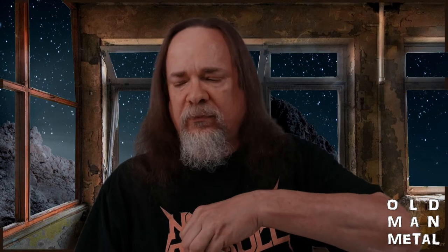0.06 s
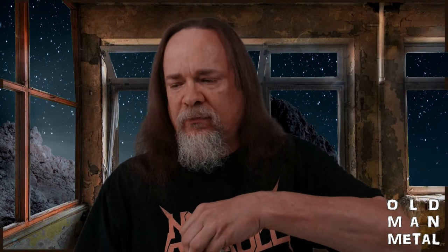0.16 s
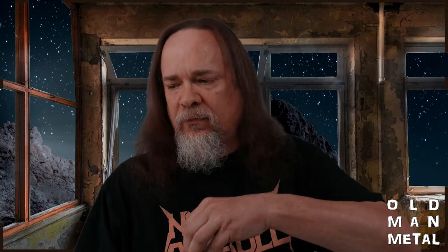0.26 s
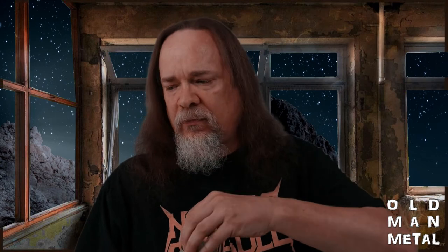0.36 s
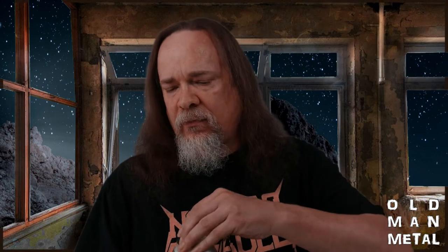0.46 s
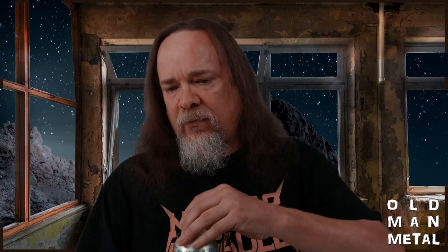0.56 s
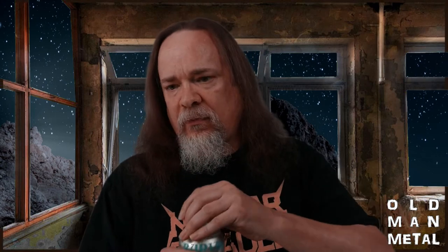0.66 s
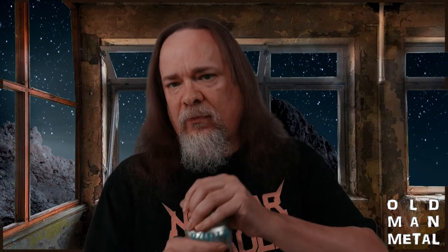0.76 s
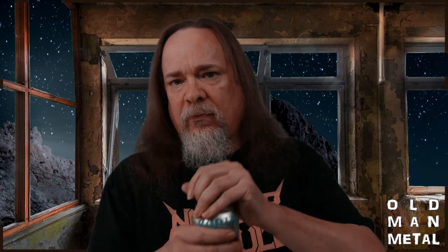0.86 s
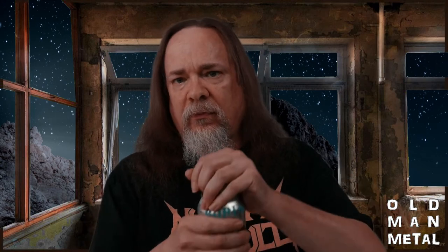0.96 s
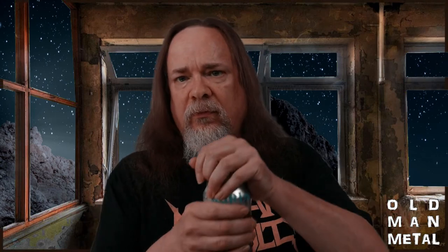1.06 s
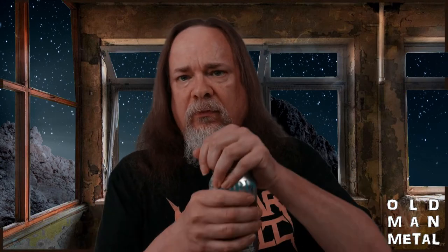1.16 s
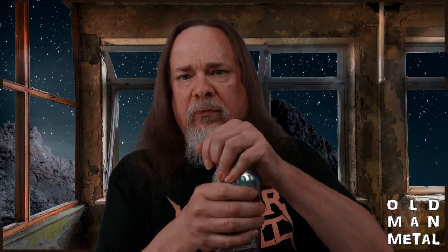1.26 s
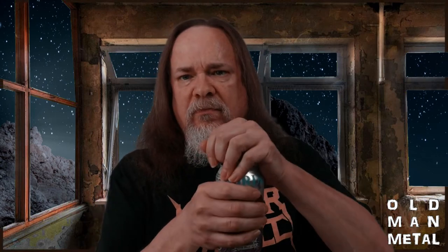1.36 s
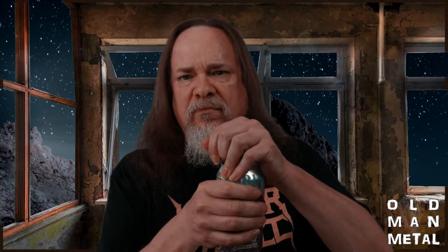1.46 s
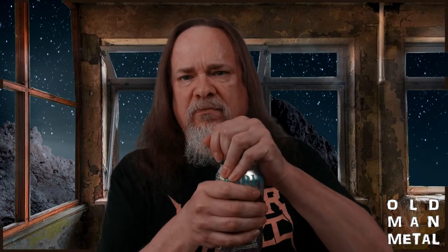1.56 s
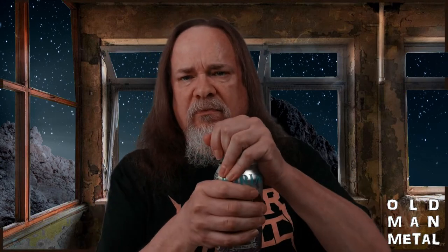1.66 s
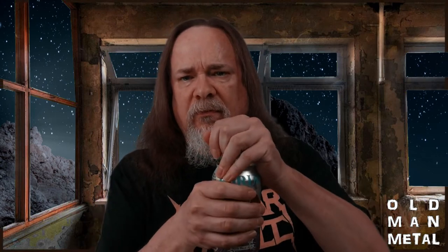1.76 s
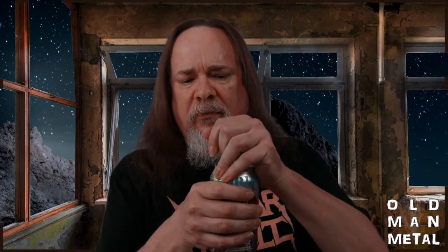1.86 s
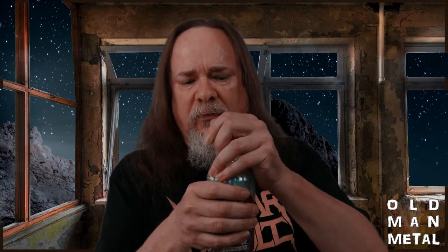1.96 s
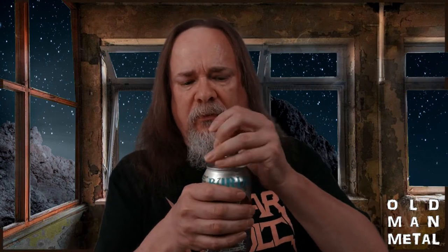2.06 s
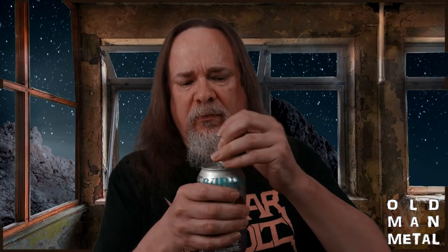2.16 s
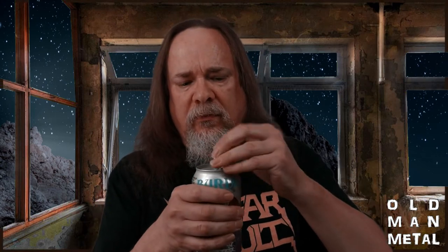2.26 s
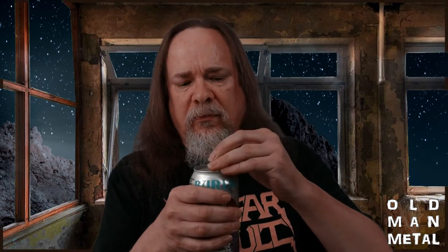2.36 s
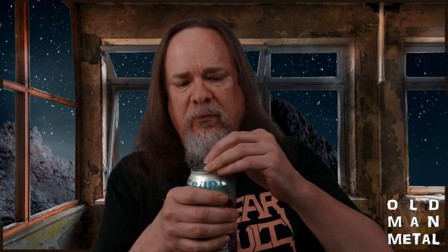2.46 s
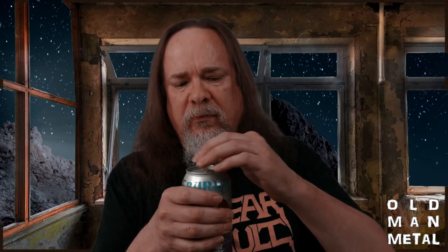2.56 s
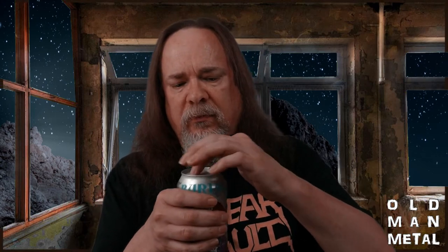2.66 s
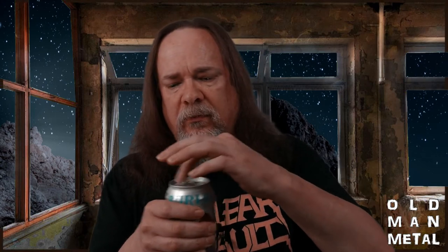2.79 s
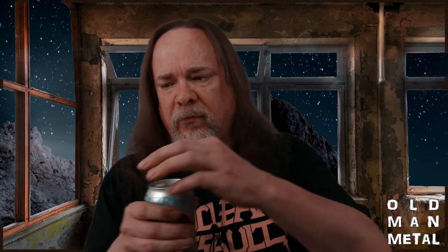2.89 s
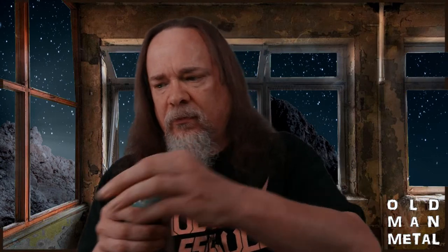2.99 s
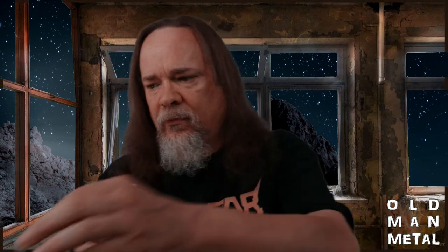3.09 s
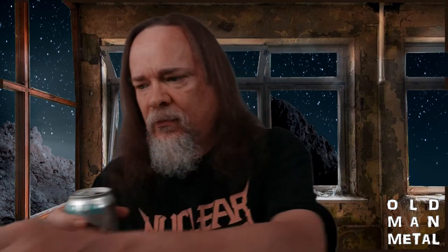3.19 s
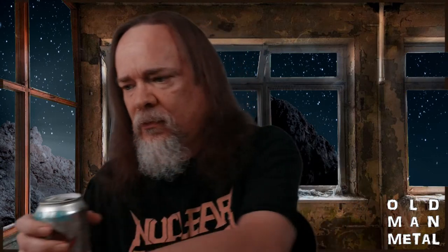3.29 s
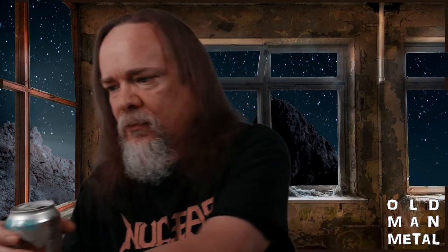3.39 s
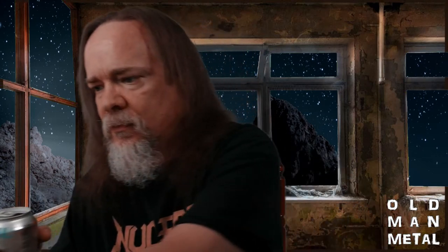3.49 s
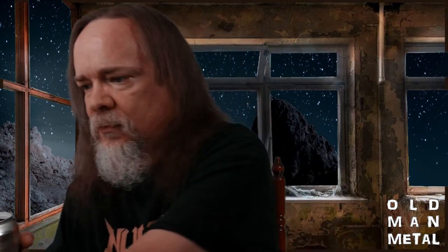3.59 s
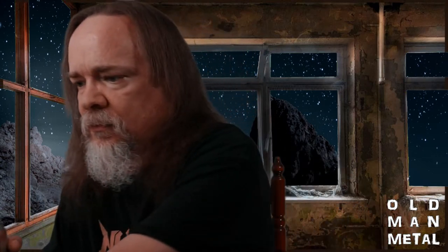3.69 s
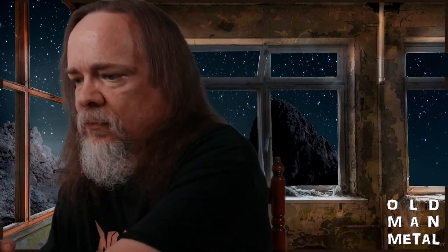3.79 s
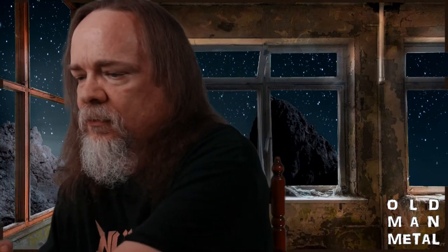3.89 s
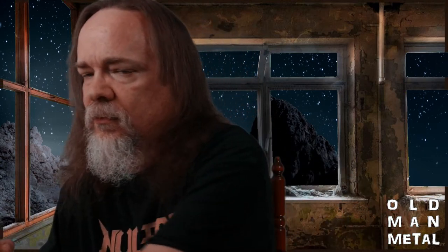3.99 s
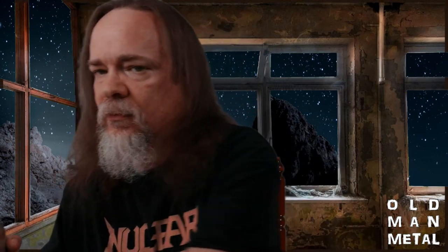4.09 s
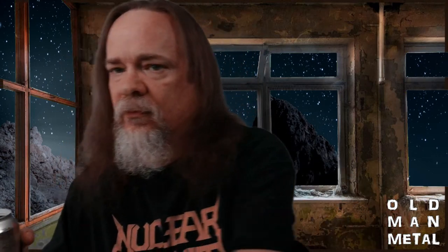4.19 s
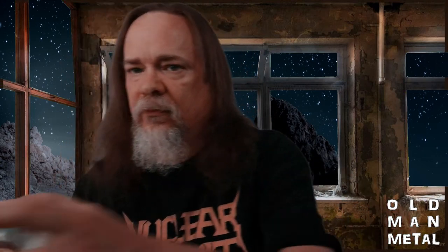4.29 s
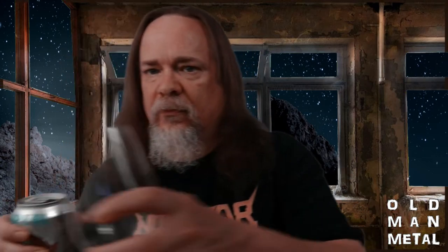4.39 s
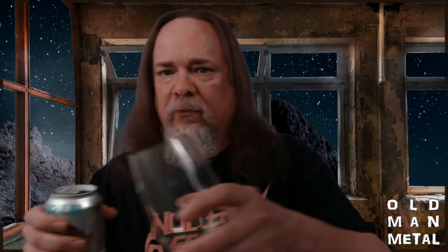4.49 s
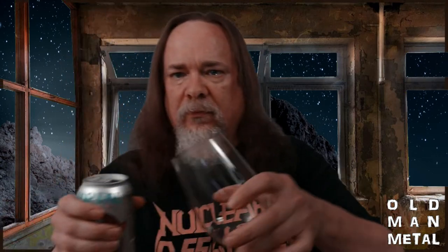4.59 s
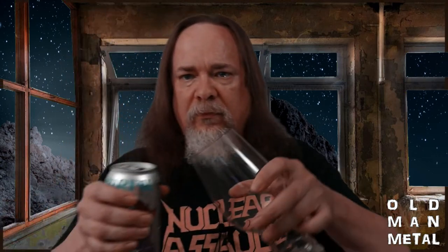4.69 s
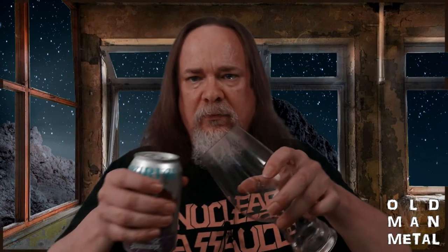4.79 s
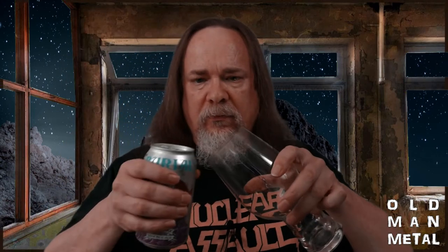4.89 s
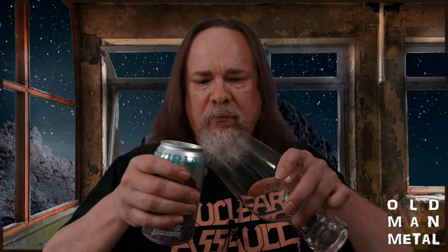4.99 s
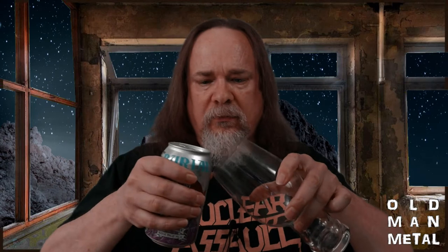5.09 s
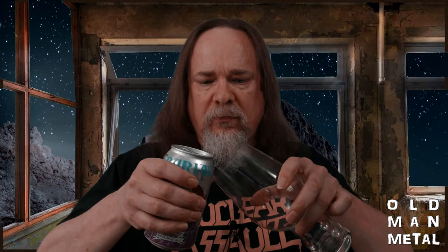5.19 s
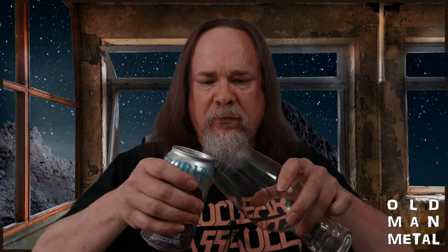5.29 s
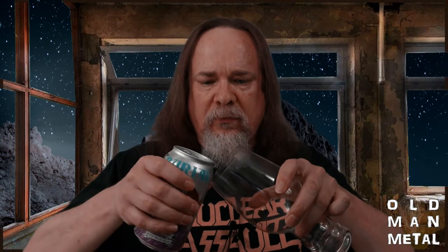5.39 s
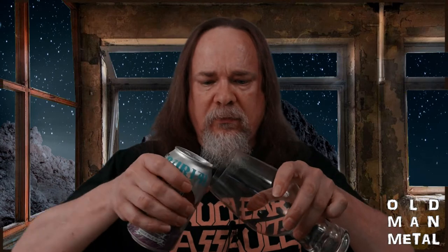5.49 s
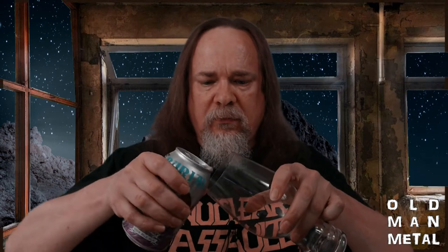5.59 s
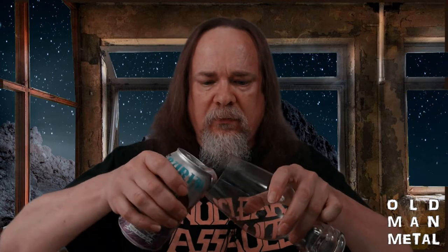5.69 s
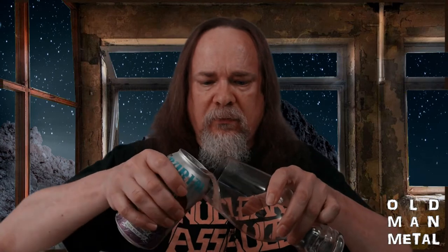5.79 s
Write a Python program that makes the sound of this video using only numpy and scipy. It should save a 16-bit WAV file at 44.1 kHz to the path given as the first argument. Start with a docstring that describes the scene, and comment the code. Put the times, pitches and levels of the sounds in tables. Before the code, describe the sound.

A fingernail picks at the tab of an aluminium drink can. The seal cracks with a very short hiss, and the lid tears open in a quick run of sharp metallic snaps. A small hollow plop and a few light ticks follow as the tab is pressed back. Then a wooden chair creaks softly and clothing rustles faintly. The microphone is close, in a small quiet room.

```python
"""Opening an aluminium beer can

Close to a microphone in a small quiet room, a fingernail picks at the tab and the seal cracks.
Gas spits out as a turbulent jet, and the lid tears in a run of snaps that excite the can's modes.
The tab is pressed back with a hollow plop and a few ticks. Then friction makes sleeves rustle
and a chair creak as the drinker leans over for a glass."""
import sys
import numpy as np
from scipy import signal
from scipy.fft import rfft, irfft, next_fast_len
from scipy.io import wavfile
from scipy.ndimage import uniform_filter1d, minimum_filter1d

SR = 44100
rng = np.random.default_rng(int(sys.argv[2]) if len(sys.argv) > 2 else 0)


def digitize_waveform(pressure):
    """Quantize a signal to 16-bit integers and store it at the path in sys.argv[1].

    Rows of a 2-D input are taken as channels; values are limited to [-1, 1].
    """
    field = np.atleast_2d(pressure).T
    bounded = np.clip(field, -1, 1)
    quanta = np.round(bounded * 32767).astype(np.int16)
    wavfile.write(sys.argv[1], SR, quanta)


N = 257984
TIME = np.arange(N) / SR
AGE = TIME[:SR // 3]  # seconds since a blow


# Tears along the score. Each row: start in seconds, level in dB, tilt in dB per octave, wall in dB.
LID_TEARS = [(1.4479, -2.5, 0.5, -48), (1.5464, -24, 0, -36), (1.5543, -10.5, 2, -29),
             (1.5735, -30, 0, -42), (1.5802, -7.5, -3, -37), (1.5856, -14, -2, -36), (1.6049, -15, -3, -32),
             (1.6169, -12, -2, -25), (1.6190, -13, -1, -28), (1.6211, -6, -2.5, -21),
             (1.6237, -3, -0.5, -17), (1.7408, -43, -2, -52)]
# Modes of the tearing lid. Each row: frequency in Hz, level in dB, T60 in seconds.
LID_MODES = [(1693, -5.5, 0.019), (2056, -2, 0.015), (2734, -11.5, 0.0088), (4590, -5.5, 0.013),
             (5360, -14.5, .011), (6230, -8, 0.0099), (7270, -9, 0.0083), (9000, -7.5, 0.003),
             (9700, -16.5, 0.0073), (12550, -18, 0.016)]
# Spectrum of ripping metal. Each row: frequency in Hz, spectral density in dB.
RIP_SPECTRUM = [(600, -27.5), (1200, -9.5), (1650, 1.5), (2100, -4), (3400, -12), (4600, -10.5),
                (8000, -12.5), (15000, -20)]

def tearing():
    """Fracture releases stress in snaps, with a grainy rip between; a small plate radiates no bass."""
    # a duller tear snaps less
    blows = [(s, db, db - 4 + 0.5 * tilt_db, tilt_db) for s, db, tilt_db, _ in LID_TEARS]
    snaps = strikes(blows, LID_MODES, snap_t60=.014, rise=.0002, front=.6)
    start_s, hold_s = 1.536, .085
    lever = np.clip((TIME - start_s) / hold_s, 0, 1)  # the rip grows as the tab is lifted
    effort = from_db(-36 + 4 * lever) * burst(start_s, attack=.015, hold=hold_s, t60=.15)
    rip = effort * noise(RIP_SPECTRUM, N) * grains(N, spread_db=4.5, size=40)
    return high_pass(snaps + rip, hz=950)


# The first crack and a last spit. Each row: start in seconds, level in dB, hold and T60 in seconds.
GAS_SPURTS = [(1.447, -26, .024, .055), (1.6228, -12.5, .003, .007)]
# Spectrum of the jet. Each row: frequency in Hz, spectral density in dB.
JET_SPECTRUM = [(300, -26), (900, -8), (1700, 0), (2400, -2), (3500, -9), (4700, -3), (7300, -1), (8550, 5),
                (9300, -1), (10500, -5), (13000, -4), (15500, -6)]

def gas_jet():
    """Turbulence in the narrow slit hisses and is spent within a few hundredths of a second."""
    flow = sum(from_db(db) * burst(s, .002, hold, t60) for s, db, hold, t60 in GAS_SPURTS)
    return flow * noise(JET_SPECTRUM, N)


# Spectrum of the puff. Each row: frequency in Hz, spectral density in dB.
PUFF_SPECTRUM = [(30, -8), (130, -2), (350, -8.5), (550, -7), (1000, -15.5), (3000, -64)]

def gas_puff():
    """Wind noise: the first spurt buffets the microphone with low pressure fluctuations."""
    gust = burst(GAS_SPURTS[0][0], attack=.002, hold=.026, t60=.075)
    return from_db(-39.5) * gust * noise(PUFF_SPECTRUM, N)


# Fingernail picks. Each row: start in seconds, ring in dB, snap in dB, tilt in dB per octave.
NAIL_PICKS = [(0.3446, -59, -39, -3.5), (0.3700, -55, -37, -6), (0.3836, -36.5, -35, 5),
              (0.42, -20, -22.5, -1), (0.4464, -43, -36.5, -5), (0.669, -51, -38, -8),
              (0.8290, -57, -51, -3), (0.8358, -53, -42.5, -1.5), (2.0598, -44.5, -48, 1),
              (2.1020, -49, -60, -6), (5.1610, -59, -45, -10), (5.1660, -57, -46.5, 0.5)]
# Modes of a tick on the lid. Each row: frequency in Hz, level in dB, T60 in seconds.
LID_TICK_MODES = [(1950, 0, .06), (4160, -10, .011), (5120, -14, .012), (6120, -16, .012)]
# Slides over the lid. Each row: peak time in seconds, level in dB, seconds to fade by 20 dB.
NAIL_SLIDES = [(0.29, -66, .02), (0.358, -56, .025), (0.421, -36, .007), (0.889, -60, .018)]
# Spectrum of the sliding nail. Each row: frequency in Hz, spectral density in dB.
NAIL_SPECTRUM = [(1200, -9), (2000, -6.5), (3200, -27), (4250, 4.5), (5000, -26), (8000, -24), (15000, -57)]

def fingernail():
    """Impacts on tab and can, before and after it opens, ping briefly; friction adds a faint scrape."""
    picks = strikes(NAIL_PICKS, LID_TICK_MODES, snap_t60=.02, rise=.00059, front=.19)
    scrape = swells(NAIL_SLIDES) * noise(NAIL_SPECTRUM, N) * grains(N, spread_db=3, size=90)
    return picks + scrape


# Modes of the can wall. Each row: frequency in Hz, level in dB, T60 in seconds.
WALL_MODES = [(434, -11, 0.011), (616, -7, .014), (793, -6, .022), (1073, -1.5, 0.026), (1262, 0, 0.031)]

def wall(pick_db=-11.5, snap_db=-15.5, tilt_db=-3.5):
    """Mechanical coupling: picks and tears flex the thin wall, most as the flap gives way."""
    from_picks = [(s, db + pick_db) for s, db, _, _ in NAIL_PICKS]
    from_tears = [(s, db) for s, _, _, db in LID_TEARS]
    blows = [(s, db, db + snap_db, tilt_db) for s, db in from_picks + from_tears]
    return high_pass(strikes(blows, WALL_MODES, snap_t60=.012, rise=.00017, front=.33), hz=420)


# Modes of the opened can. Each row: frequency in Hz, level in dB, T60 in seconds.
CAVITY_MODES = [(776, -13, .42), (1309, -6, .29), (1541, -7, .22), (1665, 1, .2), (2041, -1, .18),
                (2114, -3, .17), (4618, -4, .17), (7255, -4, .19), (8562, -5, .16)]

def cavity(coupling_db=-34):
    """Resonance: once the seal is broken, each further tear leaves a faint metallic ring in the can."""
    out = np.zeros(N)
    for s, tear_db, _, _ in LID_TEARS[1:]:
        for hz, db, t60 in CAVITY_MODES:
            add(out, s, mode(hz, tear_db + coupling_db + db, t60, rise=.0027))
    return out


# Taps on the tab. Each row: start in seconds, ring in dB, snap in dB, tilt in dB per octave.
TAB_TAPS = [(1.9968, -40, -47, -16), (2.4232, -31.5, -48, -11), (2.5630, -52, -51, -13),
            (2.6772, -43.5, -56, 2), (2.6935, -47, -46, 6.5), (2.7050, -51, -60, 0),
            (2.7685, -38.5, -53, -3.5)]
# Modes of the loose tab. Each row: frequency in Hz, level in dB, T60 in seconds.
TAB_MODES = [(540, -18.5, 0.07), (1630, -18, 0.045), (1996, -0.5, 0.016), (2355, -2.5, 0.017),
             (2920, -11, 0.03)]

def tab():
    """Strong damping: the loose tab only ticks as it is pressed back and tapped."""
    return strikes(TAB_TAPS, TAB_MODES, snap_t60=.016, rise=.000099, front=.34)


# The plop. Its row: start in seconds, ring in dB, snap in dB, tilt in dB per octave.
AIR_PLOPS = [(1.9975, -31.5, -55, -5)]
# Modes of the air pocket. Each row: frequency in Hz, level in dB, T60 in seconds.
POCKET_MODES = [(497, -4, 0.19), (588, 5.5, 0.041)]

def air_pocket():
    """Air resonance in the opened can gives a hollow plop."""
    return strikes(AIR_PLOPS, POCKET_MODES, snap_t60=.025, rise=.002, front=.2)


# Creaks of the joints. Each row: start in seconds, crack in dB, thud in dB, rise in seconds.
CHAIR_CREAKS = [(3.139, -53, -57.5, 0.006), (3.449, -41.5, -63, 0.0037), (3.487, -45.5, -60, 0.0088),
                (3.552, -39.5, -48.5, .0087), (3.647, -34, -43.5, 0.01), (3.791, -32, -46.5, 0.024),
                (3.841, -38.5, -41.5, 0.0052), (4.440, -54.5, -66, .0056), (4.637, -40.5, -59, 0.0094)]
# Spectrum of the wood. Each row: frequency in Hz, spectral density in dB.
WOOD_SPECTRUM = [(100, -13), (350, 2.5), (750, -0.5), (1050, 3.5), (1550, -2), (2100, -9.5), (3100, -15),
                 (4200, -22.5), (9000, -29.5), (15000, -37)]

def chair(thud_lag_s=.0052):
    """Stick-slip friction: a joint slips under shifting weight and the frame answers with a thud."""
    out = np.zeros(N)
    for s, crack_db, thud_db, rise in CHAIR_CREAKS:
        slips = grains(len(AGE), spread_db=1.5, size=60) * noise(WOOD_SPECTRUM, len(AGE))
        add(out, s, from_db(crack_db) * 2 * slips * dying(t60=.081, rise=rise))
        add(out, s + thud_lag_s, thud(thud_db, t60=.16, rise=.014))
    return out


# The hand bumps the can. Each row: start in seconds, level in dB, T60 in seconds.
HAND_BUMPS = [(0.341, -49, 0.027), (0.418, -42.5, 0.054), (0.911, -44, 0.023)]

def hand():
    """Damped impacts of a soft hand on the can make dull knocks."""
    out = np.zeros(N)
    for s, db, t60 in HAND_BUMPS:
        add(out, s, thud(db, t60, rise=.0082))
    return out


# Spectrum of a soft knock. Each row: frequency in Hz, spectral density in dB.
THUD_SPECTRUM = [(40, -15), (100, 0), (180, 4.5), (260, -3), (350, 2), (500, -33), (1500, -36.5)]

def thud(db, t60, rise):
    """A slow contact excites mainly low frequencies."""
    return from_db(db) * 2 * noise(THUD_SPECTRUM, len(AGE)) * dying(t60, rise)


# Arm moves. Each row: peak time in seconds, level in dB, seconds to fade 20 dB, tilt in dB per octave.
ARM_MOVES = [(0.57, -59.5, 0.67, -2), (1.17, -65, 1.5, 1), (3.47, -55, 0.87, 0.73),
             (4.531, -59.5, 1.08, 0.5), (5.779, -58, 0.81, -3)]
# Spectrum of sleeves and shirt. Each row: frequency in Hz, spectral density in dB.
CLOTH_SPECTRUM = [(40, 1.5), (150, 1), (290, 0), (350, 3.5), (400, -0.5), (520, 0.5), (800, -7), (1400, -9),
                  (2500, -13), (5000, -23), (15000, -29)]

def rustle():
    """Friction of cloth on cloth makes noise that swells and fades with each move."""
    return sum(swells([(s, db, fade)]) * noise(CLOTH_SPECTRUM, N, tilt_db)
               for s, db, fade, tilt_db in ARM_MOVES)


# Spectrum of the noise floor. Each row: frequency in Hz, spectral density in dB.
FLOOR_SPECTRUM = [(12, -32), (20, 4.5), (49, 1), (137, -8), (362, -14.5), (416, -18), (834, -17.5),
                  (985, -19.5), (1100, -17), (1200, -19), (3170, -26.5), (14300, -27), (15500, -28.5)]
# Likeness of left and right. Each row: frequency in Hz, correlation from 0 to 1.
FLOOR_CORRELATION = [(50, 1), (500, .95), (2000, .87), (8000, .68), (15000, .7)]

def background():
    """Partial coherence: steady room rumble and microphone hiss are nearly the same in both ears."""
    hz = np.fft.rfftfreq(N, 1 / SR)
    alike = np.clip(at_hz(FLOOR_CORRELATION, hz), 0, .999)
    side_gain = np.sqrt((1 - alike) / (1 + alike))
    side = irfft(rfft(noise(FLOOR_SPECTRUM, N)) * side_gain, N)
    return from_db(-62) * (noise(FLOOR_SPECTRUM, N) + side * [[1], [-1]])


# Reverberation of the room. Each row: frequency in Hz, T60 in seconds, spectral density in dB.
ROOM_DECAY = [(151, .33, -29), (400, 0.12, -14.5), (782, 0.27, -9), (1600, 0.23, -15), (3200, .28, -13.5),
              (6400, 0.2, -21.5), (10800, 0.09, -11.5), (15000, .11, -14.5)]

def room(x, wet_db, side_db, desk_db=-17, desk_lags_s=(.0080, .0081)):
    """Reflection: a desk echo reaches each ear in turn; a diffuse tail decays at each band's own rate."""
    edges = np.geomspace(100, 18000, 16)
    tail = np.zeros((2, len(AGE)))
    for low, high in zip(edges, edges[1:]):
        hz = np.sqrt(low * high)
        band_pass = signal.butter(2, [low, high], "band", fs=SR, output="sos")
        band = signal.sosfilt(band_pass, rng.standard_normal(tail.shape))
        band = rms_one(band * dying(at_hz(ROOM_DECAY, hz), rise=.008))
        bandwidth_gain = np.sqrt(2 * (high - low) / SR / len(AGE))
        tail += from_db(at_hz(ROOM_DECAY, hz, column=2)) * band * bandwidth_gain
    mid, side = from_db(wet_db) * signal.fftconvolve(x[None], tail, axes=1)[:, :N]
    echoes = from_db(desk_db) * np.array([np.interp(TIME - lag, TIME, x) for lag in desk_lags_s])
    return x + echoes + mid + from_db(side_db) * side * [[1], [-1]]


# Spectrum of a snap on the can. Each row: frequency in Hz, spectral density in dB.
SNAP_SPECTRUM = [(150, -30), (700, -23.5), (1200, -10.5), (1900, -2), (3000, -2.5), (3700, -6.5), (4400, 3),
                 (8300, -2), (10500, -5.5), (15000, -8)]

def strikes(blows, modes, snap_t60, rise, front, front_t60=.002, scatter_db=.7):
    """Modal superposition: each blow is a sharp-fronted broadband snap plus the ringing of the modes."""
    out = np.zeros(N)
    for s, ring_db, snap_db, tilt_db in blows:
        envelope = dying(snap_t60, rise) + front * dying(front_t60, rise)
        sound = from_db(snap_db) * noise(SNAP_SPECTRUM, len(AGE), tilt_db) * envelope
        for hz, mode_db, t60 in modes:
            treble_db = tilt_db * np.log2(max(hz / 2000, 1))
            sound += mode(hz, ring_db + mode_db + treble_db + scatter_db * rng.normal(), t60, rise)
        add(out, s, sound)
    return out


def mode(hz, db, t60, rise):
    """Free vibration: a damped sinusoid of random phase."""
    return from_db(db) * dying(t60, rise) * np.sin(2 * np.pi * (hz * AGE + rng.random()))


def dying(t60, rise):
    """Exponential damping: after a quick rise, the envelope falls 60 dB in t60 seconds."""
    return (1 - np.exp(-AGE / rise)) * from_db(-60 * AGE / t60)


def burst(s, attack, hold, t60):
    """Envelope with a linear attack, held until s + hold, then an exponential release."""
    age = TIME - s
    return np.clip(age / attack, 0, 1) * from_db(-60 * np.clip((age - hold) / t60, 0, 10))


def swells(strokes):
    """Incoherent addition: rubbing strokes grow and fade symmetrically, and their powers add."""
    gains = [from_db(db - 20 * np.minimum(np.abs(TIME - s) / fade, 10)) for s, db, fade in strokes]
    return np.sqrt(sum(gain ** 2 for gain in gains))


def grains(count, spread_db, size):
    """Random amplitude modulation by tiny slips, each about size samples long; rms 1."""
    slow = rms_one(uniform_filter1d(rng.standard_normal(count), size))
    return rms_one(from_db(spread_db * np.clip(slow, -2, 2)))


def noise(spectrum, size, tilt_db=0):
    """Random-phase noise of rms 1 with the given spectrum, tilted in dB per octave above 500 Hz."""
    padded = next_fast_len(size)
    hz = np.maximum(np.fft.rfftfreq(padded, 1 / SR), 1)
    gain = from_db(at_hz(spectrum, hz) + tilt_db * np.log2(np.maximum(hz, 500))) * (hz > 15)
    phases = np.exp(2j * np.pi * rng.random(len(hz)))
    return rms_one(irfft(gain * phases, padded)[:size])


def high_pass(x, hz):
    """Steep low cut: a small plate radiates bass poorly."""
    return signal.sosfilt(signal.butter(4, hz, "high", fs=SR, output="sos"), x)


def at_hz(points, hz, column=1):
    """Interpolate a column of a table on a log-frequency axis."""
    table = np.array(points)
    return np.interp(np.log(np.maximum(hz, 1)), np.log(table[:, 0]), table[:, column])


def add(track, s, sound):
    """Superpose a sound on the track at s seconds."""
    start = int(np.clip(s * SR, 0, N - 1))
    track[start:start + len(sound)] += sound[:N - start]


def from_db(db):
    """Decibels to gain."""
    return 10 ** (np.asarray(db) / 20)


def rms_one(x):
    """Scale to rms 1."""
    return x / np.sqrt(np.mean(x ** 2) + 1e-20)


def scene(right_lead_db=.7):
    """A level difference puts the opening can just right of centre; the rest is in the middle."""
    pan = from_db(right_lead_db / 2 * np.array([[-1], [1]]))
    opening = room(tearing() + wall() + cavity() + gas_jet(), wet_db=-1, side_db=-12)
    touches = room(fingernail() + tab() + air_pocket(), wet_db=-6, side_db=-19)
    drinker = room(chair() + hand() + rustle(), wet_db=0, side_db=-19)
    return (opening + touches) * pan + drinker + gas_puff() + background()


def record(dry, ceiling=1.0, limiter_s=.001, cutoff_hz=16700):
    """Peak limiting turns down anything above the ceiling; a steep low-pass cuts the top."""
    size = int(limiter_s * SR)
    needed = ceiling / np.maximum(np.abs(dry).max(axis=0), ceiling)
    gain = uniform_filter1d(minimum_filter1d(needed, size), size)
    return signal.sosfilt(signal.cheby2(20, 70, cutoff_hz, fs=SR, output="sos"), dry * gain)


dry = scene()
out = record(dry)
digitize_waveform(out)
```